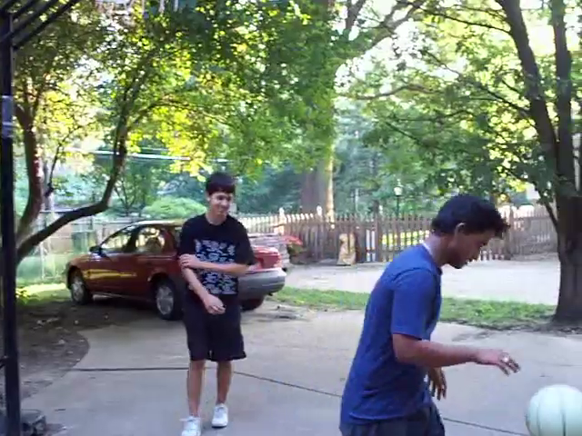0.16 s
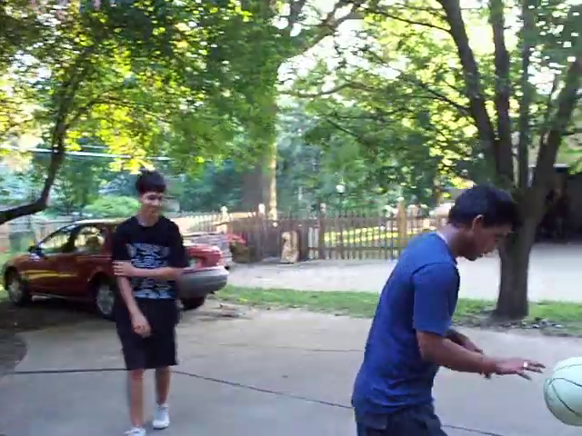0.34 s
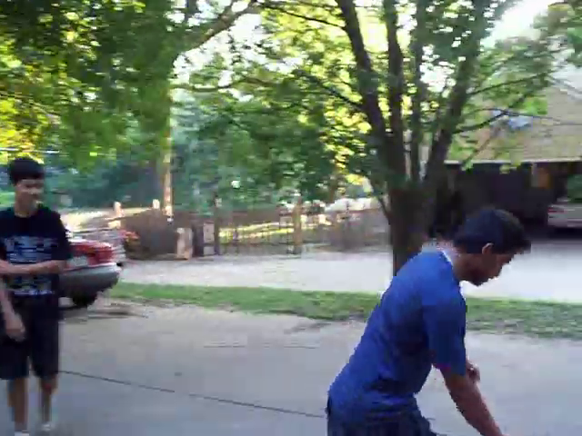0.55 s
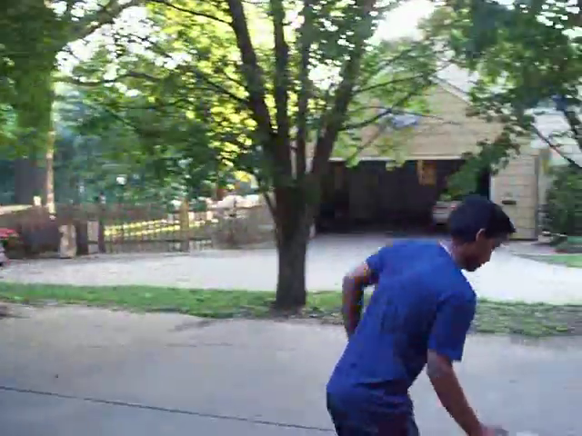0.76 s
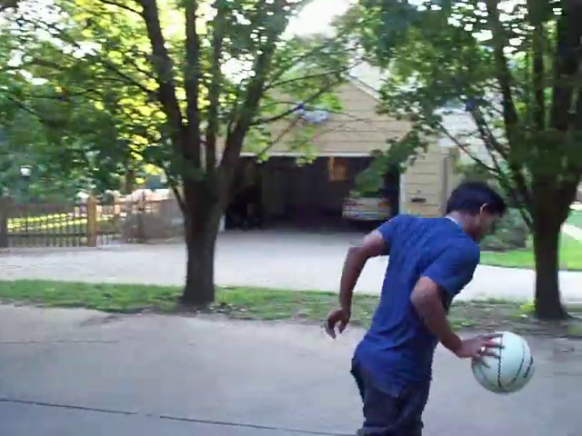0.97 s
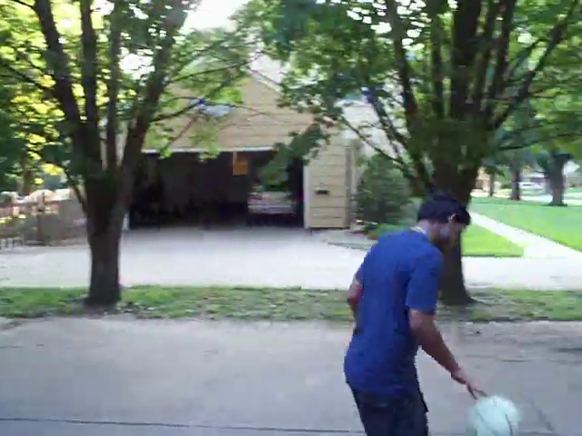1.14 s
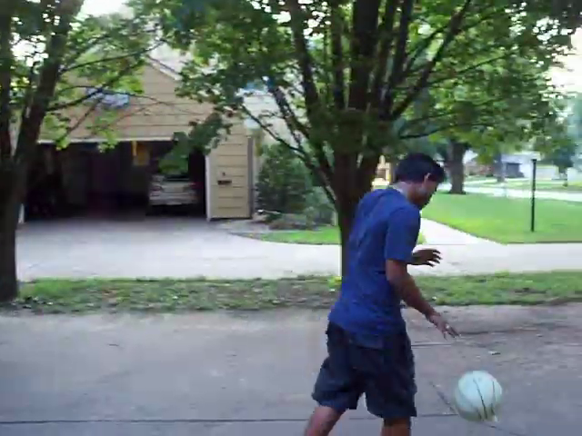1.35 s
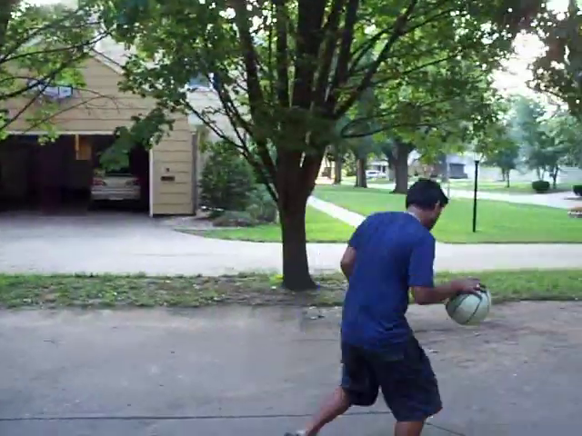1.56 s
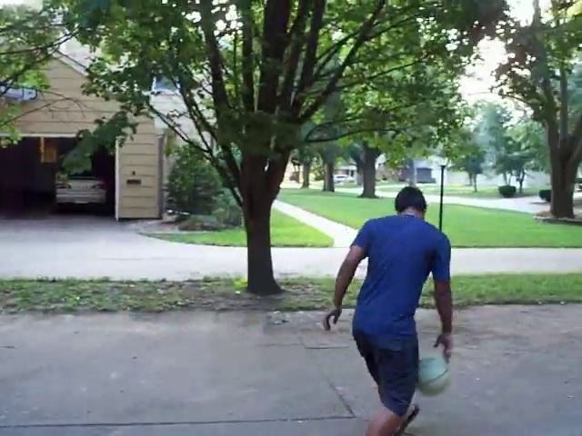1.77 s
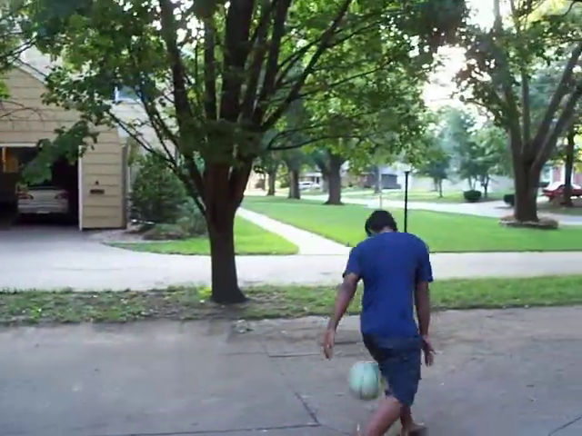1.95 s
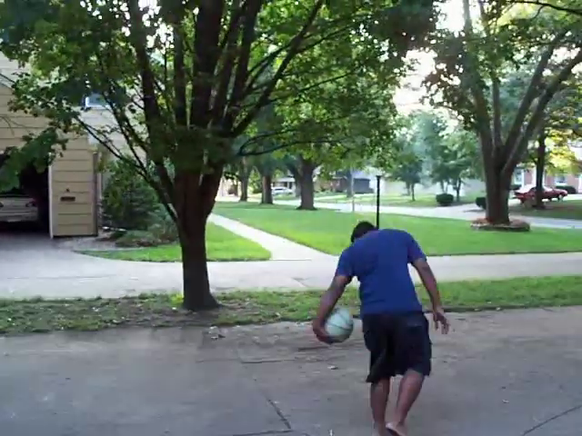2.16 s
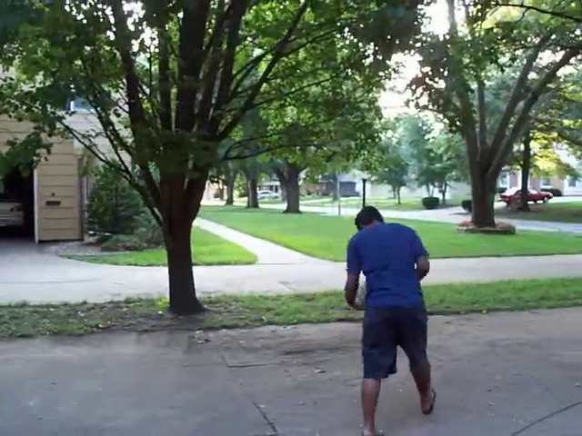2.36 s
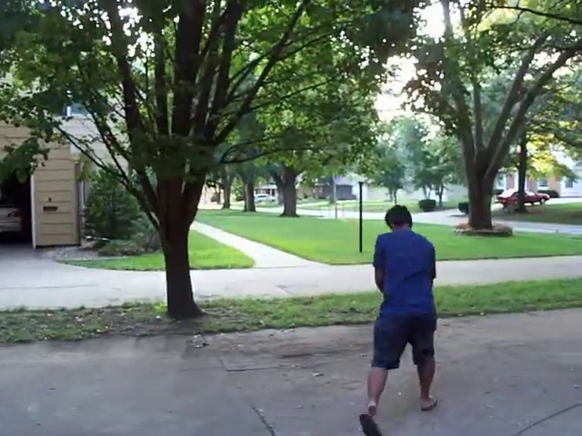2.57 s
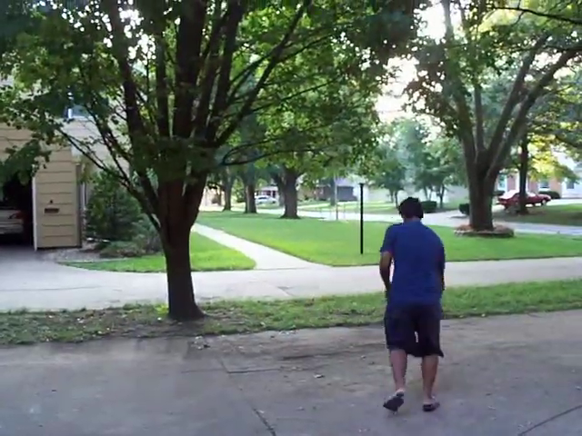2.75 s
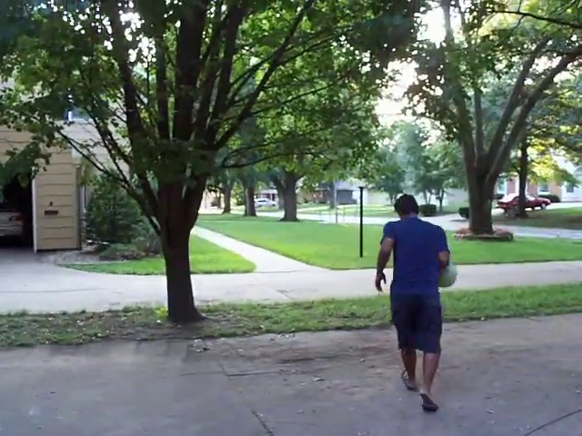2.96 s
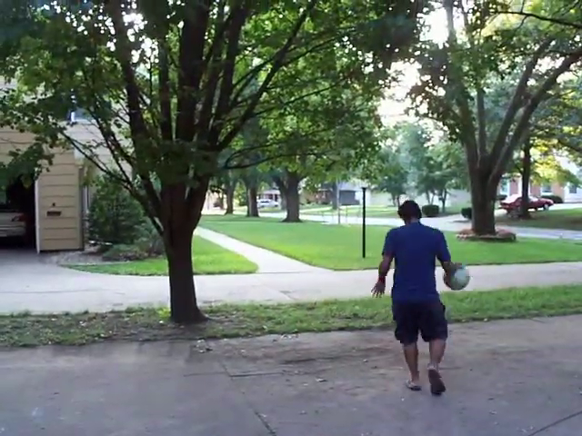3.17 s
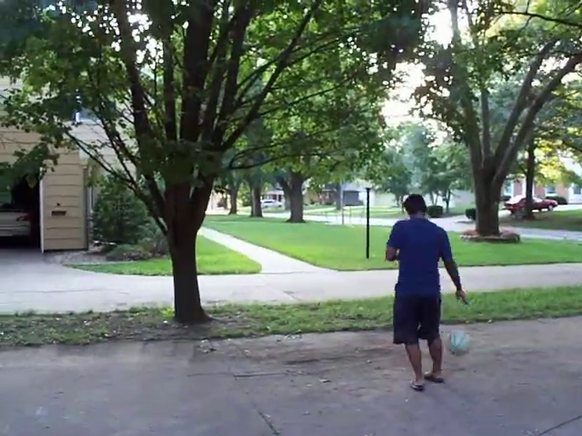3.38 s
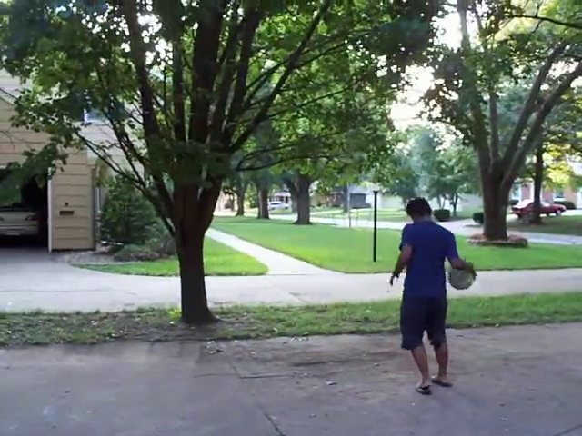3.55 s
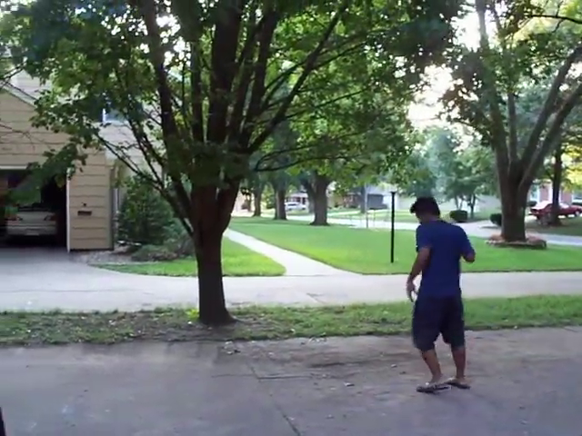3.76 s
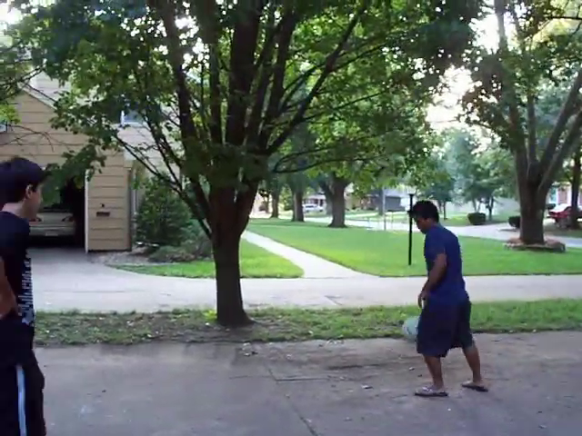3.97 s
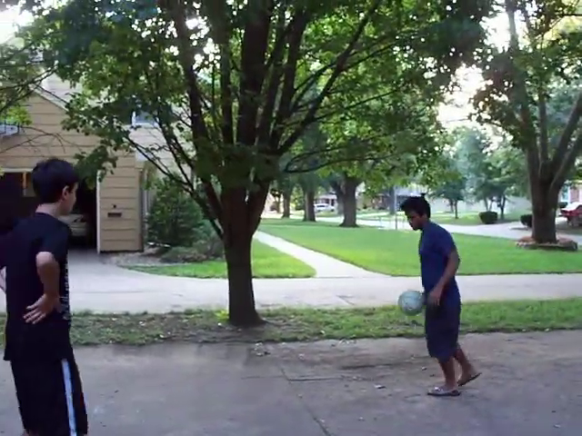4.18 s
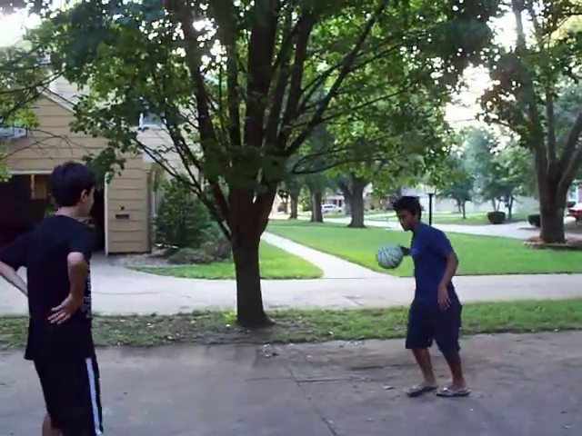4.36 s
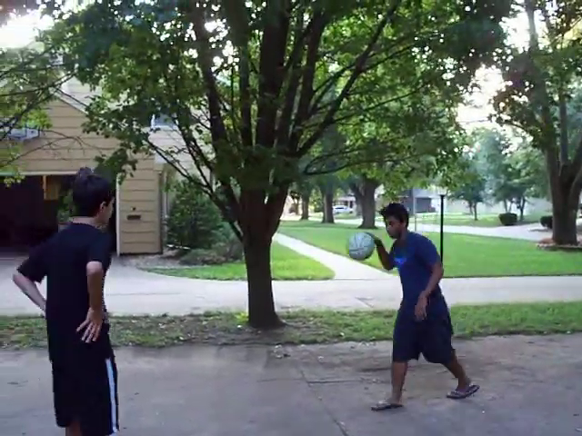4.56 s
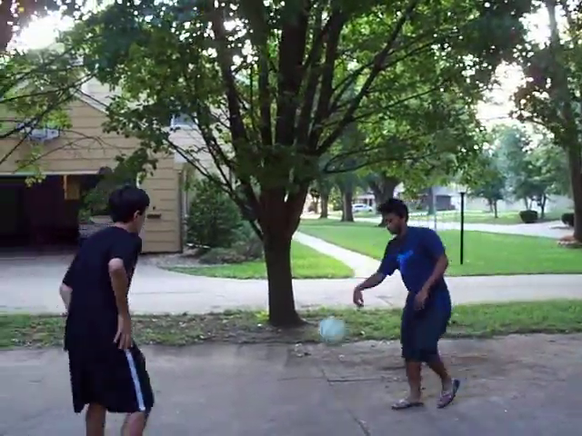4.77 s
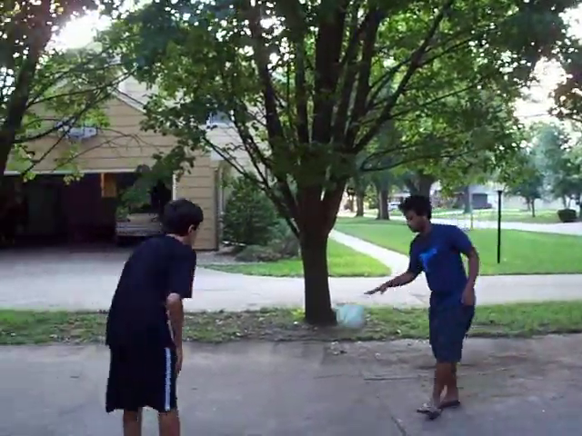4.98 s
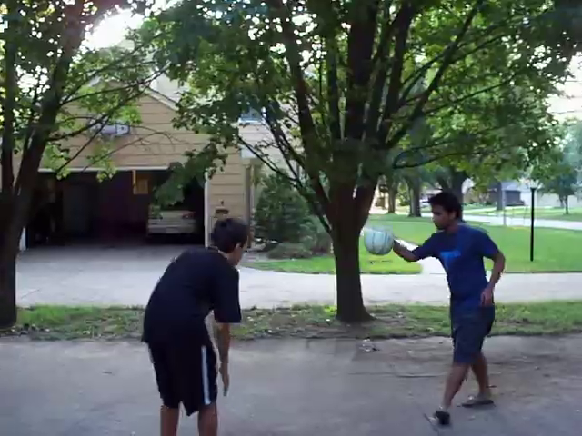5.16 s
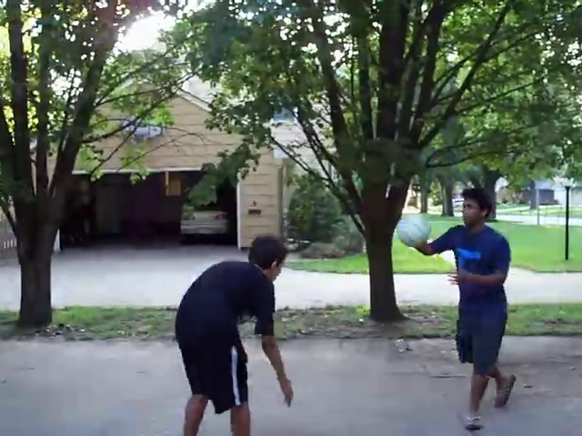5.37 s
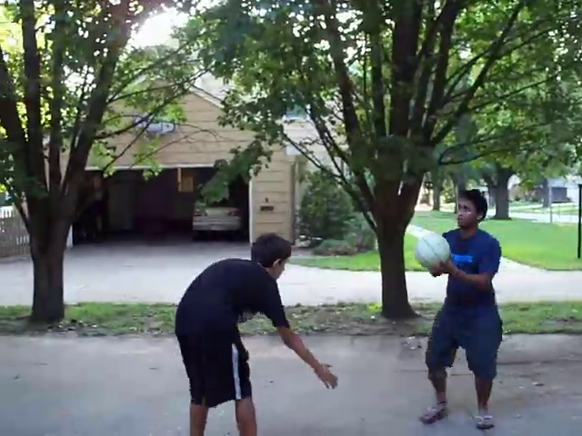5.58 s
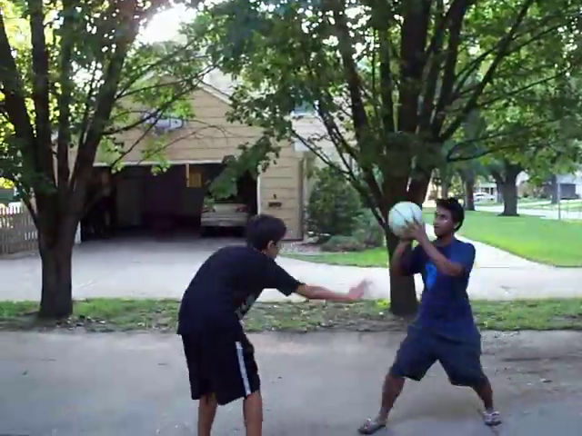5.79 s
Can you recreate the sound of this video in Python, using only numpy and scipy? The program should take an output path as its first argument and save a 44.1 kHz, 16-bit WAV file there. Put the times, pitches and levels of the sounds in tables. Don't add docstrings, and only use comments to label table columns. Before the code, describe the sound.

The echo of an earlier bounce fades under a sandal slap and scuff, with a distant bird. Seven loud ball landings follow, crisp at first, one with hardly any crack midway, then more slanted and lower, the last the heaviest. Gritty footsteps and palm pats fill the gaps; thin far whistles appear late. Close handheld microphone in an open yard, limited treble, light hiss, overloaded peaks.

```python
import sys
import numpy as np
from scipy import signal
from scipy.io import wavfile
from scipy.ndimage import uniform_filter1d

SR = 44100
rng = np.random.default_rng(int(sys.argv[2]) if len(sys.argv) > 2 else 0)


def decibels_to_gain(level_db):
    exponent = np.asarray(level_db, float) / 20
    return 10 ** exponent


def wav_record(signal):
    frames = np.transpose(np.atleast_2d(signal))
    bounded = np.clip(frames, -1, 1)
    quanta = np.round(bounded * 32767).astype(np.int16)
    wavfile.write(sys.argv[1], SR, quanta)


N = 256662


def level(x, db):
    return x * decibels_to_gain(db) / np.sqrt(np.mean(x ** 2))


def band(x, hz, octaves, order=2):
    edges = np.clip(hz * 2. ** (np.array([-octaves, octaves]) / 2), 10, SR / 2.2)
    return signal.sosfilt(signal.butter(order, edges, "band", fs=SR, output="sos"), x)


def add(out, x, s):
    i = int(round(s * SR))
    x = x[max(-i, 0):N - i]
    out[max(i, 0):max(i, 0) + len(x)] += x


def walk(rate, count=N):
    knots = uniform_filter1d(np.repeat(rng.standard_normal(900), 4), size=4)
    return 1.2 * np.interp(np.arange(count) * 4 * rate / SR, np.arange(len(knots)), knots)


# [f/Hz, level/dB, t60/s]
BALL_MODES = [(83.3, -17, .1), (121, -25, 0.3), (235, -16, 0.16), (640, -21, 0.059), (900, -21, 0.054),
              (1102, -16, 0.055), (1560, -14, 0.027), (1786, -27.5, 0.14), (2670, -76.5, 0.14),
              (2930, -43, 0.14), (3750, -25, 0.033), (4700, -55, 0.025)]


def bounce(crack_db, slap_db, thump_db, thump_hz, deep_db, air_db, swings, lead_rad, slowing):
    u = np.arange(int(.2 * SR)) / SR

    w = (u - .0003) / .00006
    crack = 1.14 * (.15 - w) * np.exp(-w ** 2 / 2)

    rubber = level(band(rng.standard_normal(len(u)), 1480, 2.92), 0)
    slap = rubber * np.exp(-(u / 0.0012) ** 0.52) * np.clip((u - .0003) / 0.0004, 0, 1)

    turn = thump_hz * u
    press = np.sin(np.pi * np.clip(turn / swings, 0, 1) ** .95).clip(0) ** .75
    swing = np.sin(2 * np.pi * turn * (1 - slowing * turn) + lead_rad)
    thump = press * (swing + 0.08 * np.cos(4 * np.pi * turn + 0.62))

    rings = np.zeros(len(u))
    for hz, db, t60 in BALL_MODES:
        detune, spread = rng.standard_normal(2)
        extra_db = deep_db if hz < 100 else air_db if hz > 500 else 0
        decay = decibels_to_gain(db + extra_db + 1.3 * spread - 60 * u / t60)
        rings += decay * np.sin(2 * np.pi * hz * (1 + 0.02 * detune) * u)

    body = thump + rings * np.clip(u / 0.0026, 0, 1)
    body = signal.sosfilt(signal.butter(2, 52, "high", fs=SR, output="sos"), body)
    return decibels_to_gain(crack_db) * crack + decibels_to_gain(slap_db) * slap + decibels_to_gain(thump_db) * body


# [t/s, thump level/dB, crack level/dB, yard echo level/dB, slant of the landing 0-1]
BOUNCES = [
    (.6210, -5.5, 1.5, -30, .3),
    (1.2333, -6, 2.6, -30, 0),
    (1.8557, -8, .9, -29.5, .25),
    (2.6898, -6.5, -14, -29.5, .1),
    (3.3371, -7.5, 1, -28.5, .8),
    (4.0446, -8, -2.5, -30.5, .85),
    (4.8626, -4.5, .5, -26.5, 1),
]


def dribble():
    thump_hz, lead_rad, contact_swings = (172, 122), (-1.2, 1.3), (2.1, 1.25)
    deep_ring_db, air_ring_db = (9, -2), (3, 2)
    landing = (thump_hz, lead_rad, contact_swings, deep_ring_db, air_ring_db)
    out = np.zeros(N)
    for s, thump_db, crack_db, yard_db, slant in BOUNCES:
        hz, lead, swings, deep_db, air_db = (a + (b - a) * slant for a, b in landing)
        slap_db = -7 + .35 * crack_db
        air_db += .45 * crack_db
        add(out, bounce(crack_db, slap_db, thump_db, hz, deep_db, air_db, swings, lead, slowing=.02), s)
        add(out, decibels_to_gain(yard_db) * yard(treble_db=.3 * crack_db), s)
    add(out, decibels_to_gain(-28.5) * yard(), -0.11)
    return out


# [f/Hz, level/dB, t60/s]
YARD_BANDS = [(75, 4.5, .35), (140, 3, 0.5), (240, 2.5, 0.33), (519, -0.5, 0.3), (1032, -1.5, 0.42),
              (2376, 0, .45), (3740, -2.5, 0.49), (6480, -8, 0.52)]


def yard(treble_db=0, skip=0):
    gap_s, rise_s = 0.0025, 0.022
    u = np.arange(int(.7 * SR)) / SR
    noise = rng.standard_normal(len(u))
    tail = np.zeros(len(u))
    for hz, db, t60 in YARD_BANDS[skip:]:
        band_db = db + (treble_db if hz > 400 else 0)
        decay = decibels_to_gain(1.2 * walk(46, count=len(u)) - 60 * u / t60)
        tail += level(band(noise, hz, 0.94), band_db) * decay
    tail *= 1 + 0.33 * np.exp(-u / 0.025)
    return tail * decibels_to_gain(2.4 * walk(500, count=len(u))) * np.clip((u - gap_s) / rise_s, 0, 1)


# [t/s, level/dB, f/Hz, t60/s, yard echo level/dB]
PALMS = [
    (1.018, -26, 148, .05, -48),
    (3.005, -18, 137, 0.02, -40.5),
    (4.534, -29, 140, 0.047, -59),
    (5.466, -31.5, 503, .06, -55),
    (5.468, -34.5, 1435, 0.038, -67),
    (.178, -38, 755, 0.087, -70),
]


def palms():
    out = np.zeros(N)
    u = np.arange(int(.1 * SR)) / SR
    for s, db, hz, t60, yard_db in PALMS:
        thud = decibels_to_gain(db - 60 * u / t60) * np.sin(2 * np.pi * hz * u)
        add(out, thud * np.clip(u / 0.0005, 0, 1), s)
        add(out, decibels_to_gain(yard_db) * band(yard(), 200, 2.0), s)
    return out


# [t/s, level/dB, ring f/Hz, heel level/dB, share of ring 0-1]
SLAPS = [(.167, -24, 3620, -42, .3), (1.021, -9, 820, -31.5, .45), (1.471, -26.5, 610, -37, .35),
         (1.803, -21, 1320, -47, .3), (1.919, -10.5, 800, -30, .3), (2.081, -23.5, 680, -40, .2),
         (2.524, -23, 1100, -42, .25), (2.613, -18.5, 800, -51, .3), (2.864, -18, 3450, -35, .1),
         (3.01, -16, 550, -28, .35), (3.845, -25, 660, -50, .3), (4.444, -27, 1870, -55, .4),
         (4.536, -14, 3100, -29, .75), (4.847, -27, 2493, -39.5, .1), (5.387, -20.5, 3600, -62, .4),
         (5.632, -35, 1940, -61, .2), (5.759, -24.5, 2650, -61, .2), (5.794, -19, 1950, -43, .55)]
# [t/s, level/dB, ring f/Hz]
TICKS = [(.237, -28, 4440), (.461, -39, 565), (.826, -33, 2600), (.851, -31, 2300), (.88, -27, 2370),
         (.91, -29, 2750), (.945, -31, 2930), (1.828, -29, 5500), (2.175, -36, 563), (2.655, -26, 3800),
         (2.914, -26, 5700), (3.701, -27, 3420), (3.886, -32, 1630), (3.949, -34, 1800), (4.459, -24, 5720),
         (4.473, -31, 2200), (4.599, -33, 3340), (4.733, -35, 5700), (4.773, -31.5, 3610),
         (5.224, -28, 2870), (5.257, -30, 2380), (5.267, -28, 3580), (5.322, -36, 4500), (5.331, -35, 4000),
         (5.395, -22.5, 3740), (5.401, -32, 3000), (5.435, -39, 2020), (5.668, -40, 900),
         (5.685, -37, 1600), (5.694, -39, 1100)]


def steps():
    slap_decay_ms, tick_decay_ms = 2.8, 2.1
    tick_ring, tick_heel_db = .85, -28
    lead_s = .004
    out = np.zeros(N)
    u = np.arange(int(.06 * SR)) / SR - lead_s
    echoes = [yard(skip=3) for _ in range(4)]
    rows = [(*row, slap_decay_ms, share) for *row, share in SLAPS]
    rows += [(s, db, hz, db + tick_heel_db, tick_decay_ms, tick_ring) for s, db, hz in TICKS]
    for k, (s, db, hz, heel_db, decay_ms, share) in enumerate(rows):
        shape = np.where(u < 0, np.exp(u / 0.00055), np.exp(-1000 * u / decay_ms))
        grit = rng.standard_normal((3, len(u))) * shape
        grit[:2, len(u[u < 0])] = -3.5

        ring = 3.5 * band(grit[0], hz, 1.2)
        click = band(grit[1], 2420, 2.6)
        sole = share * ring + (1 - share) * click
        heel = band(grit[2], 280, 0.98)
        hit = decibels_to_gain(db - 0.5) * sole / abs(sole).max() + decibels_to_gain(heel_db) * heel / abs(heel).max()
        add(out, hit, s - lead_s)

        echo = echoes[k % len(echoes)]
        colored = (1 - 0.73 * share) * echo + 3.1 * share * band(echo, hz, 0.99)
        add(out, decibels_to_gain(db - 33) * colored, s)
    return out


# [hardest press t/s, swell by 20 dB/s, fade by 20 dB/s, level/dB, brightness level/dB]
SCUFFS = [(.172, .004, .09, -43, -6), (.465, .01, .2, -55, 3), (.87, .25, .2, -44, 2),
          (1.02, .04, .15, -39.5, -14), (1.478, .09, .09, -41, -4), (2.082, .015, .05, -47, 4),
          (2.618, .006, .2, -41.5, 3), (2.87, .006, .3, -49, 9), (3.015, .015, .1, -39, -6),
          (3.696, .1, .09, -49.5, 5), (3.855, .015, .2, -46, 4), (4.445, .004, .15, -45, 3),
          (4.505, .09, .045, -38.5, -3), (4.545, .008, .11, -49, 9), (4.855, .02, .02, -42, -2),
          (5.262, .1, .03, -57, 8), (5.47, .008, .04, -42.5, -18), (5.635, .02, .1, -55, -8),
          (5.754, .008, .1, -45, 2), (5.805, .045, .2, -36, -5)]


def scuffs():
    grains = rng.standard_normal((2, N)) * decibels_to_gain(2.75 * rng.exponential(size=(2, N)))
    grains *= decibels_to_gain(2.37 * walk(70))
    dull = level(band(grains[0], 1050, 3.5), 1.06)
    bright = level(band(grains[1], 3610, 1.96), -3.3)
    t = np.arange(N // 32 + 1) * 32 / SR
    gain = np.zeros((2, len(t)))
    for s, swell_s, fade_s, db, bright_db in SCUFFS:
        press_db = -20 * np.maximum((s - t) / swell_s, (t - s) / fade_s)
        gain += decibels_to_gain(db + press_db + np.array([[0], [bright_db]]))
    dull_gain, bright_gain = (np.interp(np.arange(N) / SR, t, g) for g in gain)
    return dull_gain * dull + bright_gain * bright


# [t/s, length/s, first f/Hz, last f/Hz, level/dB]
WHISTLES = [
    (4.19, .24, 2898, 2922, -68.5),
    (4.17, .27, 4528, 4515, -66.5),
    (5.09, .06, 2906, 2906, -63),
    (5.14, .1, 2903, 2901, -58),
    (5.23, .17, 2905, 2910, -66),
    (5.48, .17, 4496, 4480, -73),
    (.22, .33, 3640, 3100, -66),
]


def whistles():
    fade_s = .03
    out = np.zeros(N)
    for s, length, first_hz, last_hz, db in WHISTLES:
        u = np.arange(int(length * SR)) / SR
        glide_hz = first_hz + (last_hz - first_hz) * u / length
        hz = glide_hz * (1 + 0.00255 * walk(90, count=len(u)))
        gate = np.clip(np.minimum(u, length - u) / fade_s, 0, 1)
        loudness = decibels_to_gain(db + 3.5 + 3.5 * walk(30, count=len(u)))
        add(out, gate * loudness * np.sin(2 * np.pi * np.cumsum(hz) / SR), s)
    return out


# [f/Hz, third-octave level/dB]
BACKGROUND = [(25, -66.5), (60, -60), (105, -63.5), (200, -61.5), (420, -67.5), (1300, -67), (4400, -71),
              (8500, -57)]
# [f/Hz, width/Hz, level/dB]
INSECTS = [(5620, 430, -65), (6840, 350, -74.5), (3300, 600, -66.5)]


def air():
    hz, db = np.transpose(BACKGROUND)
    noise = rng.standard_normal((2, N))
    out = np.zeros(N)
    for k, center_hz in enumerate(22 * 2 ** (np.arange(18) / 2)):
        gain_db = np.interp(np.log(center_hz), np.log(hz), db) + 2.43 + 2.15 * walk(8.6)
        out += decibels_to_gain(gain_db) * level(band(noise[k % 2], center_hz, 1 / 2), 0)
    for k, (insect_hz, width_hz, insect_db) in enumerate(INSECTS):
        buzz = level(band(noise[k % 2], insect_hz, width_hz / insect_hz * 1.73), insect_db)
        out += buzz * decibels_to_gain(2 * walk(4.4))
    return out


def scene():
    return (dribble() + palms() + steps() + scuffs() + whistles() + air())[None]


def roll_off(x):
    return signal.sosfilt(signal.butter(12, 16500, fs=SR, output="sos"), x)


def record(dry):
    top_hz, leak_top_hz = 7110, 8900
    ceiling, offset = .72, .0015
    narrow = signal.sosfilt(signal.ellip(5, .5, 29, top_hz, fs=SR, output="sos"), dry)
    narrow = signal.sosfilt(signal.ellip(8, .5, 60, leak_top_hz, fs=SR, output="sos"), narrow)
    mix = np.clip(narrow + offset, -ceiling, ceiling)
    return roll_off(mix)


dry = scene()
out = record(dry)
wav_record(out)
```